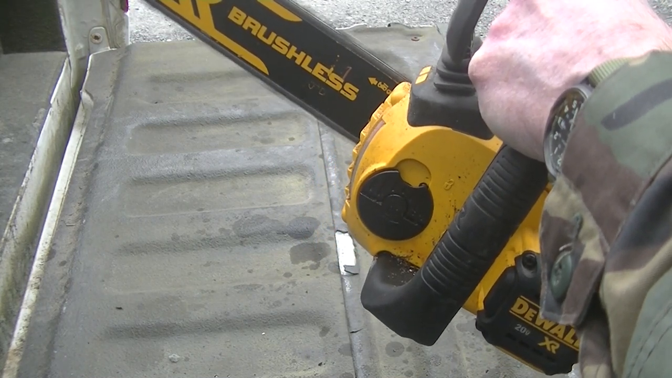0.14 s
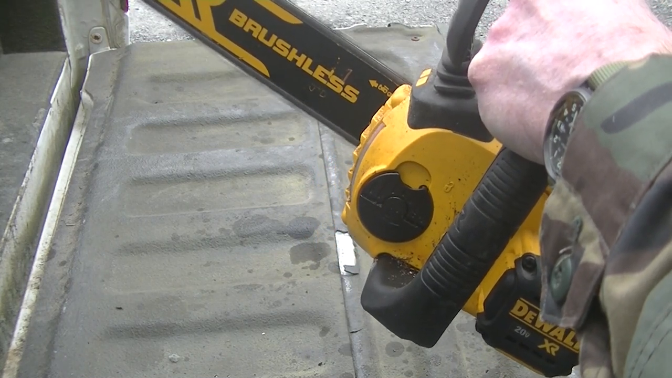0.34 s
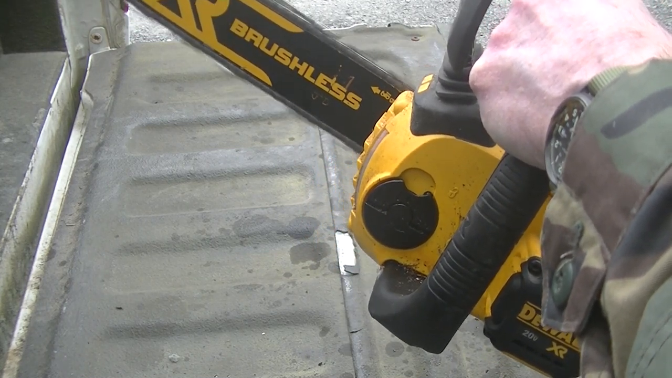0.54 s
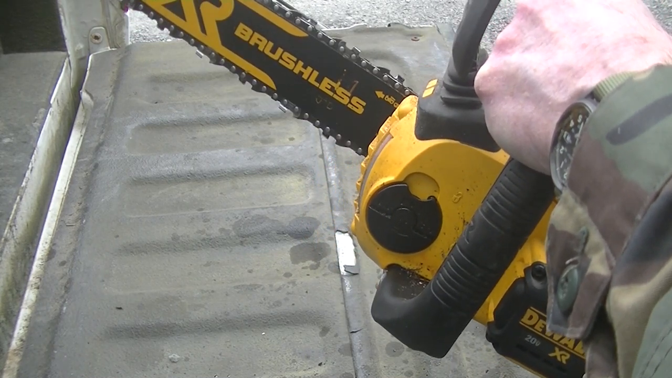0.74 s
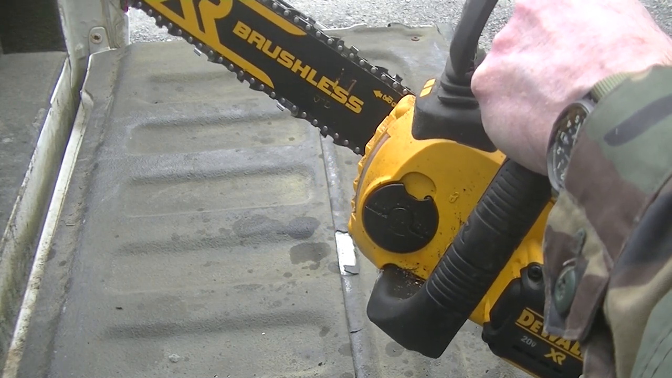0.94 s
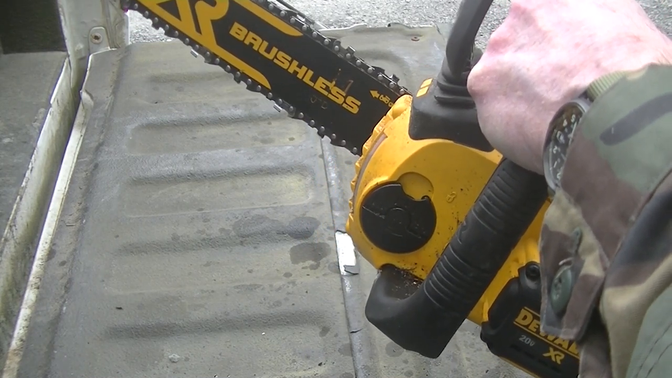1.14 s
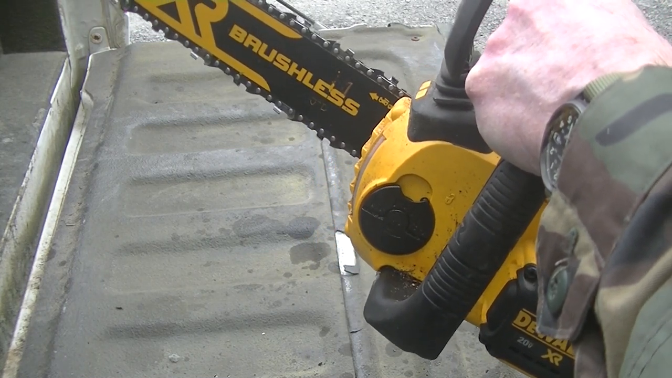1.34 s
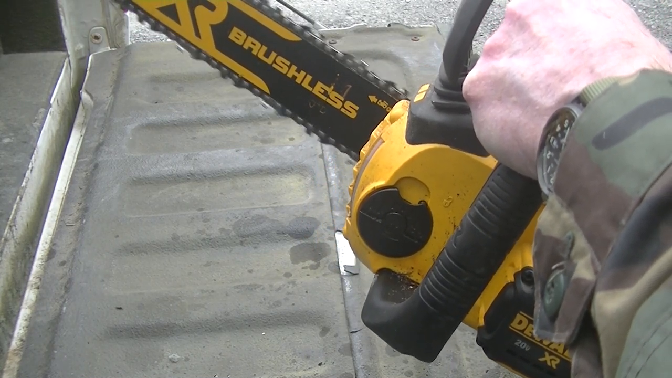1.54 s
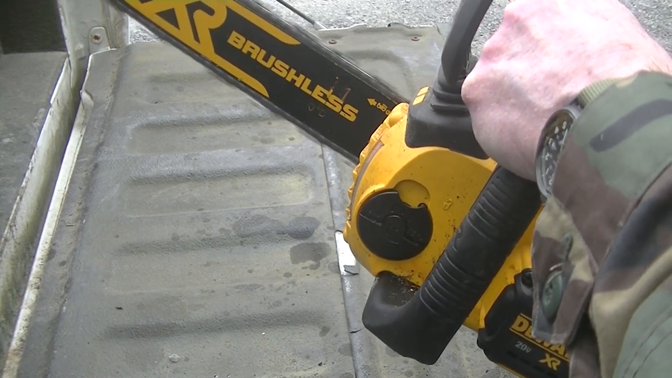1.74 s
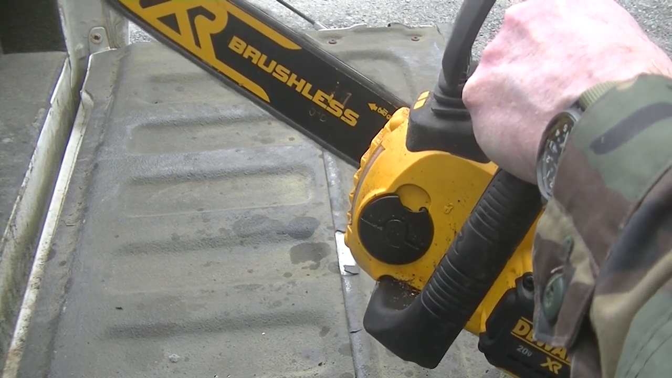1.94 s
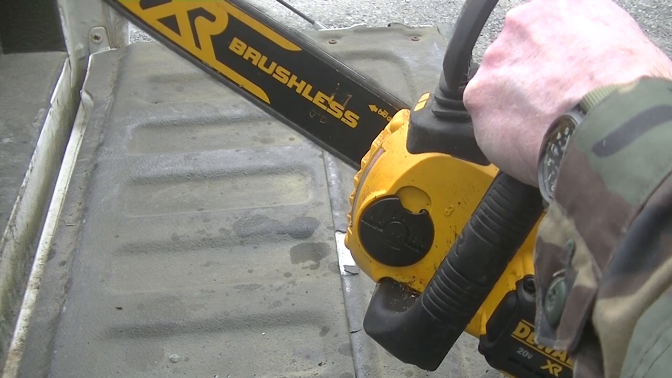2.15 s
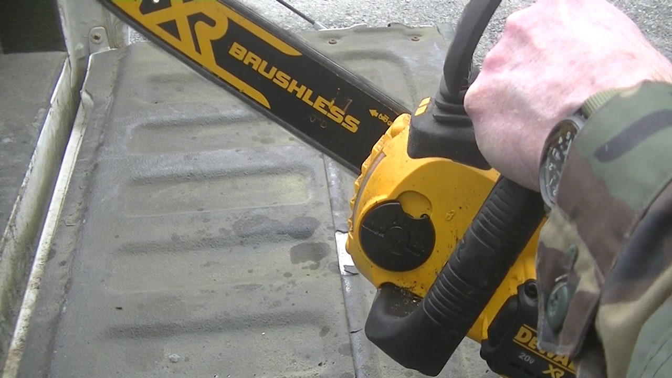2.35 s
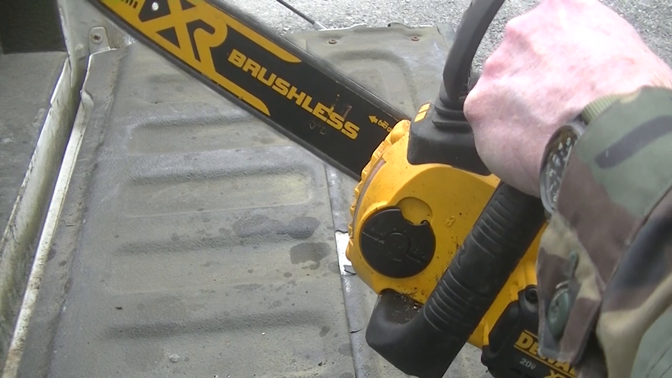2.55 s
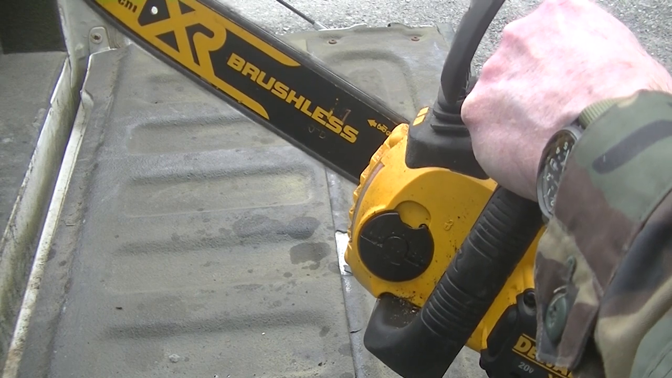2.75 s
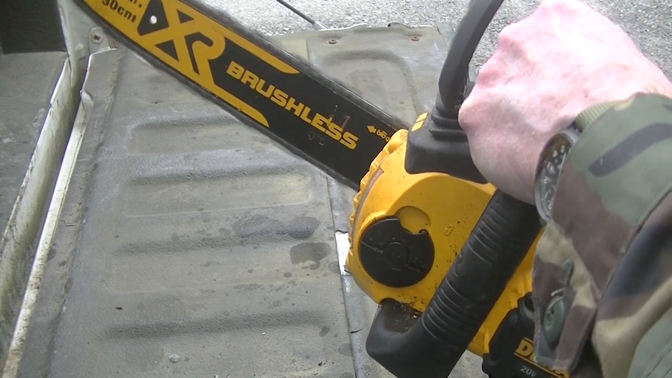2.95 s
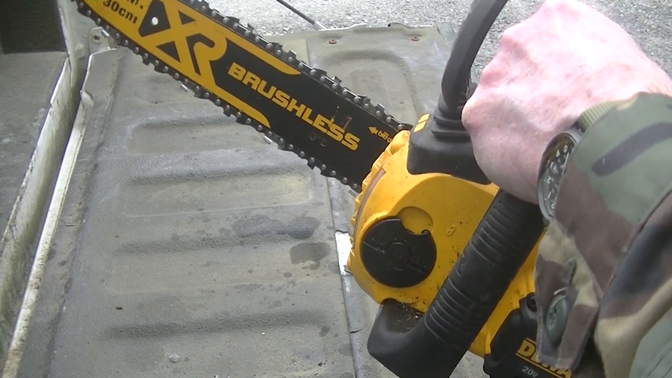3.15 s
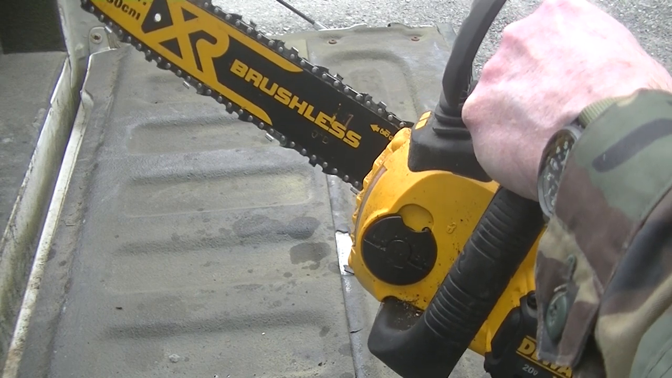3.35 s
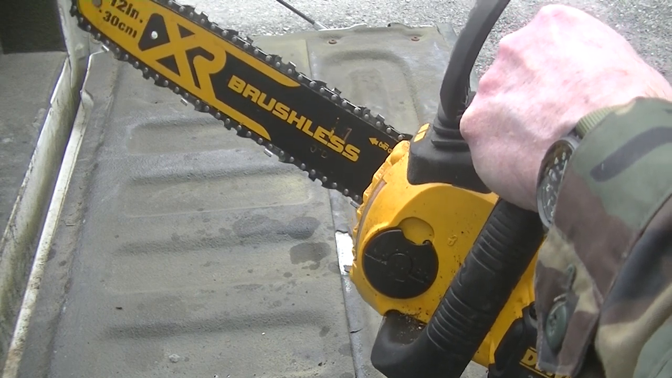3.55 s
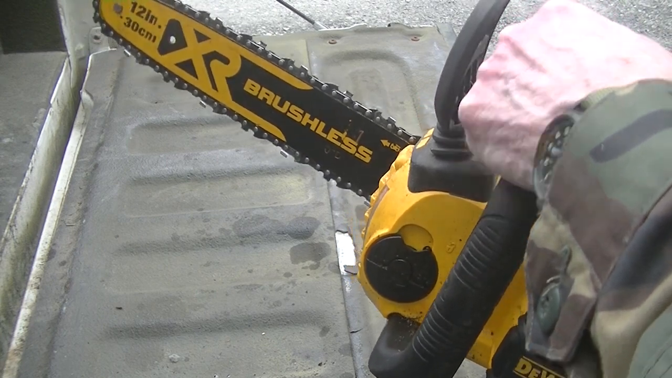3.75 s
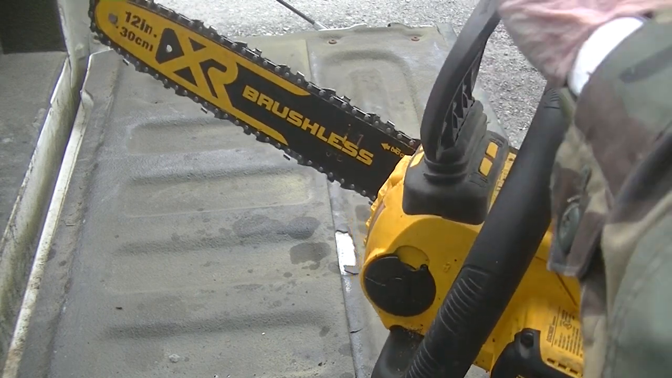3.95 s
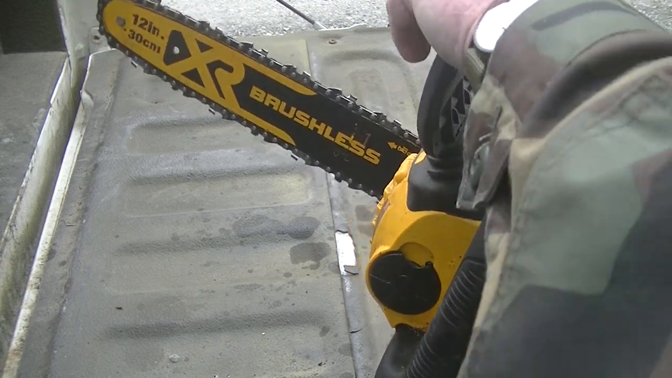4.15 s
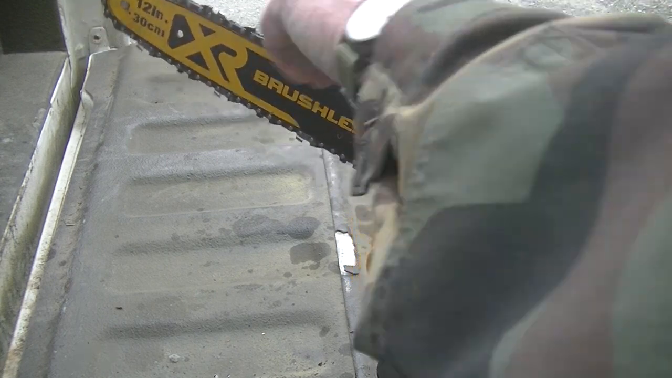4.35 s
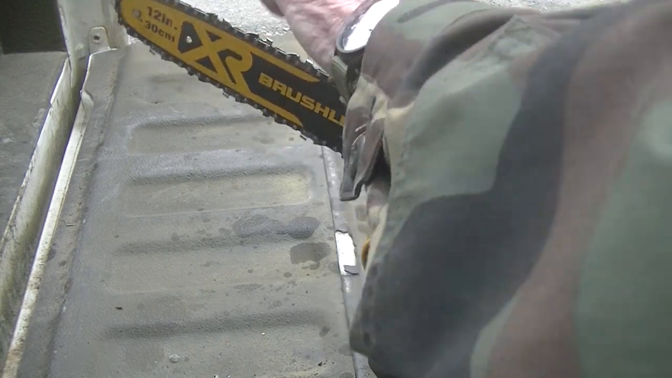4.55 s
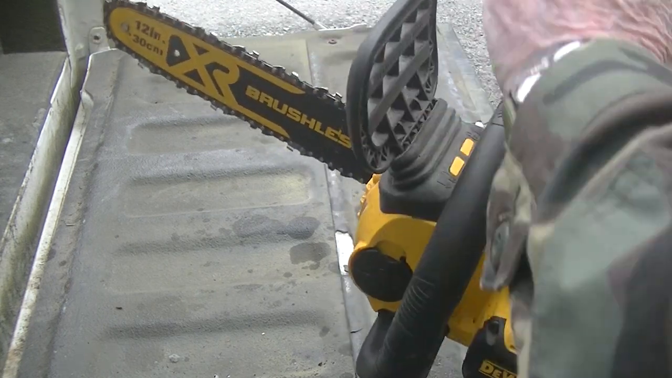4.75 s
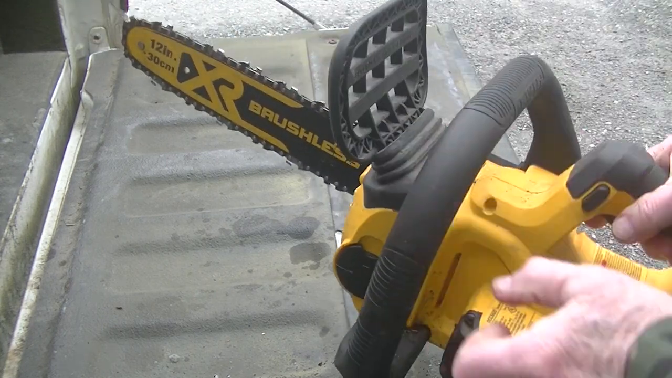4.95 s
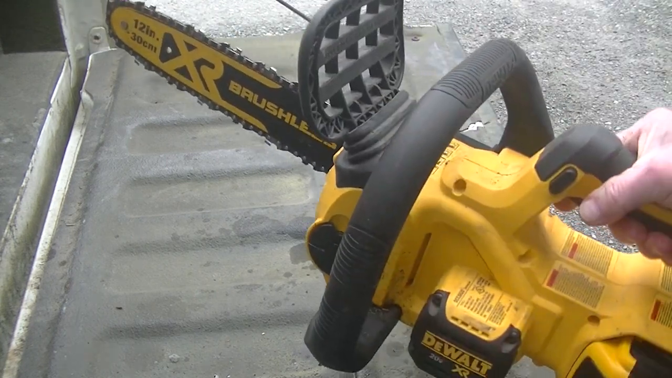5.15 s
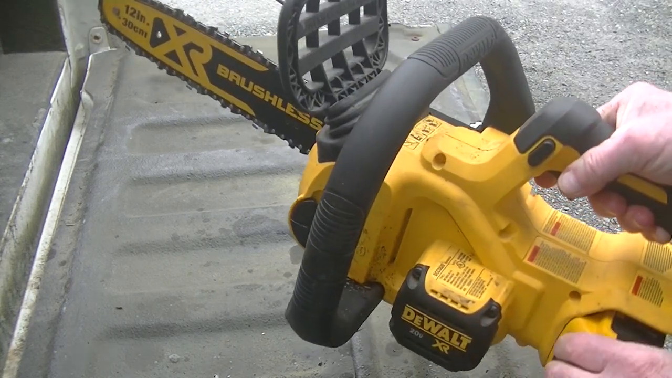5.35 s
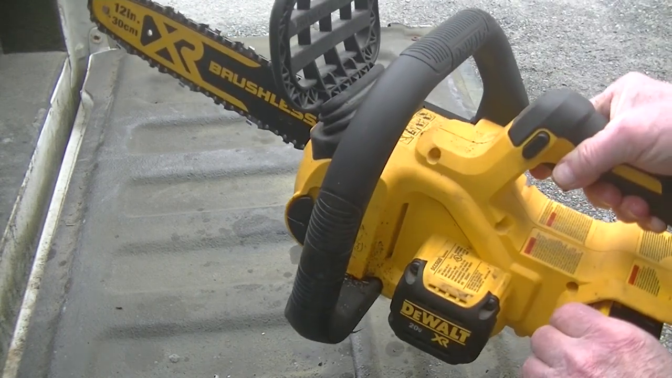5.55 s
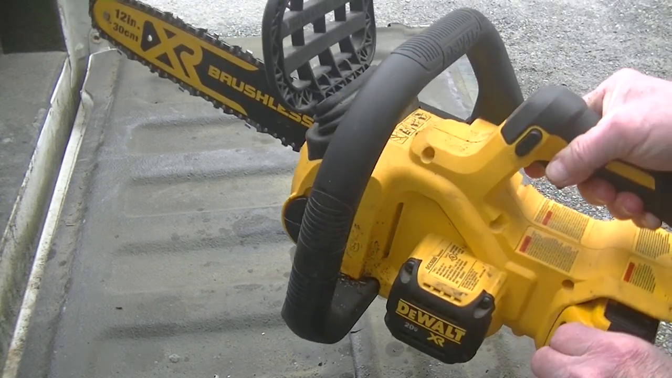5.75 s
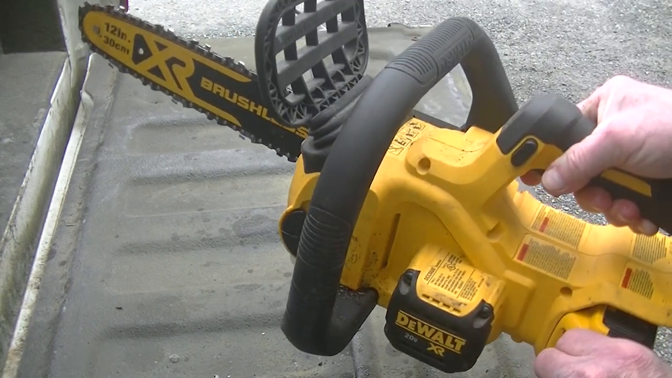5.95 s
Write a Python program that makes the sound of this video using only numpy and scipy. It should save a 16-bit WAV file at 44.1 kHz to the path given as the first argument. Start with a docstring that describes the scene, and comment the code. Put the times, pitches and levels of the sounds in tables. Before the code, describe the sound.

A cordless chainsaw runs without cutting, stops, whines up and stops again; then a sleeve rustles and the chain brake snaps.

```python
"""Cordless chainsaw running free

A chainsaw runs without load over a truck bed outdoors, stops, is run up again and stops.
Link impacts rattle along the bar, while the sprocket hums and the gear whines at multiples of the
shaft speed, all shaped by the resonances of bar and housing. Then a sleeve rustles, the chain brake
snaps, and the hands shift their grip and click the safety button."""
import sys
import numpy as np
from scipy import signal
from scipy.fft import irfft
from scipy.io import wavfile
from scipy.ndimage import uniform_filter1d

SR = 44100
rng = np.random.default_rng(int(sys.argv[2]) if len(sys.argv) > 2 else 0)


def pcm_store(signal):
    """Save signal as 16-bit PCM."""
    levels = np.round(np.clip(np.atleast_2d(signal), -1, 1) * 32767)
    wavfile.write(sys.argv[1], SR, levels.astype(np.int16).T)


N = 268569
T = np.arange(N) / SR
HZ = np.fft.rfftfreq(4096, 1 / SR)  # frequency axis of every filter curve


# Runs of the motor, the first already under way. Each row: trigger pull, trigger release and
# standstill in seconds, then relative chain level and gear level in dB.
MOTOR_RUNS = [(-1.1, 0.548, 0.705, 0.18, -35.5), (1.548, 2.925, 3.109, 0, -28)]
# Speed held by the governor. Each row: time in seconds, sprocket speed in turns per second.
GOVERNED_SPEED = [(0.1, 58.3), (0.3, 58.9), (0.5, 58.7), (2.3, 58.85), (2.68, 59.17), (2.9, 58.9)]

def motor_speed(surge_rate=175, ramp_rate=69.3, surge_s=0.13, knee=40):
    """Soft start and uniform braking: speed in turns per second surges, ramps, levels off and falls."""
    governed = np.interp(T, *np.transpose(GOVERNED_SPEED))
    speed = 0
    for start, release, rest, _, _ in MOTOR_RUNS:
        since = np.maximum(T - start, 0)
        ramp = np.minimum(surge_rate * since, surge_rate * surge_s + ramp_rate * (since - surge_s))
        held = ramp / (1 + (ramp / governed) ** knee) ** (1 / knee)
        speed = speed + held * np.clip((rest - T) / (rest - release), 0, 1)
    return speed


def run_gain(column):
    """Gating: one level column of the runs acts as a gain, zero while the motor rests."""
    return sum(amp(run[column]) * (T >= run[0]) * (T <= run[2]) for run in MOTOR_RUNS)


def torque(speed, full_acceleration=130):
    """Net torque is proportional to angular acceleration: near 1 at full pull, negative in braking."""
    return uniform_filter1d(np.gradient(speed) * SR, size=800) / full_acceleration


def chain(speed, turns, teeth=6, rattle_db=-20.1, hiss_db=-24.0):
    """Impact and friction noise: links strike the rails in bursts at the tooth rate and hiss as they slide."""
    bursts = 1 + 0.12 * np.cos(2 * np.pi * teeth * turns)
    flap = amp(0.5 * drift(45))  # the loose chain whips about
    strikes_per_s = 7000 * (.22 + (speed / speed.max()) ** 2)
    strikes = (rng.random(N) < strikes_per_s / SR) * np.sqrt(SR / strikes_per_s) * rng.choice([-1, 1], N)
    strikes *= unit(amp(-1.5 * rng.standard_normal(N))) * bursts * flap
    rattle = unit(colour(strikes, shell_db() + below(6950, order=4) + above(165, order=2)))
    sliding = strikes + bursts * flap * rng.standard_normal(N)
    hiss = unit(colour(sliding, shell_db() + above(7300, order=4)))
    rattle_gain, hiss_gain = chain_gains(speed)
    return amp(rattle_db) * rattle * rattle_gain + amp(hiss_db) * hiss * hiss_gain


def chain_gains(speed, saturation_speed=12):
    """Rattle saturates at low speed while friction hiss keeps growing; the motor's pull adds to both."""
    pull = np.clip(torque(speed), 0, 1)
    pace = speed + 0.19 * pull * speed.max()
    rattle = pace / np.hypot(pace, saturation_speed) * amp(2 * pull)
    hiss = (pace / speed.max()) ** 1.05
    running = run_gain(column=3)
    return running * rattle, running * hiss


# Radiation of bar and housing. Each row: frequency in Hz, relative gain in dB.
SHELL_RESPONSE = [(30.0, -46.5), (120.0, -48.5), (270.0, -42.5), (400.0, -26), (700.0, -29), (1200.0, -17),
                  (1700.0, -5), (2800.0, -7), (5000.0, -11), (8000.0, -20.5), (12000.0, -21),
                  (15500.0, -22.5)]
# Their resonances. Each row: frequency in Hz, width in Hz, height in dB.
SHELL_RESONANCES = [(420, 20, 2.6), (888, 205, 10.05), (1548, 200, 6.05), (1956, 130, 9.04),
                    (2256, 330, 4.2), (2577, 43, 7.1), (3013, 110, 3.5), (3831, 317, 9), (4523, 280, 7.8),
                    (5030, 65, 6.6), (5920, 151.3, 3.7), (6660, 910, 4), (10000, 1400, 7)]

def shell_db():
    """Frequency response of bar and housing: resonances on a broad curve, with the peak at 0 dB."""
    db = read(SHELL_RESPONSE) + resonances(SHELL_RESONANCES)
    return db - db.max()


# Hum of teeth and links. Each row: multiple of the sprocket speed, relative level in dB.
SPROCKET_HARMONICS = [(6, -22), (9, -32.5), (10, -25.5), (12, -17.5), (13, -35.5), (18, -24), (20, -31.5),
                      (21, -31.5), (22, -46), (24, -24.5), (27, -35.5), (28, -43), (30, -27), (32, -41),
                      (33, -33), (34, -45), (36, -51), (42, -31), (44, -33.5), (51, -35), (54, -28.5),
                      (55, -27), (60, -29), (63, -26), (66, -29), (67, -27), (71, -35)]
# Resonances of the sprocket cover. Each row: frequency in Hz, width in Hz, height in dB.
COVER_RESONANCES = [(414, 97, 1.5), (766, 62, 7.5), (900, 42, 10.5), (974, 48, 6.5)]

def sprocket(speed, turns, waver_depth=.22):
    """Periodic forcing: tooth harmonics grow with speed and torque, and swell as they cross resonances."""
    turns = turns + 0.0008 * drift(52)  # backlash
    wavers = [1 + waver_depth * drift(18) for _ in range(5)]
    hum = sum(amp(db) * wavers[i % len(wavers)] * np.cos(2 * np.pi * (multiple * turns + rng.random()))
              for i, (multiple, db) in enumerate(SPROCKET_HARMONICS))
    strain = np.minimum(abs(torque(speed)), .5)
    hum *= np.sqrt(2) * speed / speed.max() * amp(5 * strain - 0.5)
    return colour(hum, shell_db() + resonances(COVER_RESONANCES))


# Transmission of the whine through the gear case. Each row: frequency in Hz, gain in dB.
GEAR_RESPONSE = [(500, -36), (1200, -16), (1600, -3.5), (3000, -6), (4300, -1), (5200, 1), (6000, -19.5)]
# Resonances of that case. Each row: frequency in Hz, width in Hz, height in dB.
GEAR_RESONANCES = [(1590, 70, 14), (1900, 96, 15), (2270, 220, 18.7), (2835, 130, 12), (3090, 77, 11.5),
                   (3850, 130, 5.3), (4280, 200, 4.7)]
# Overtones that squeal at low speed. Each row: multiple of the mesh rate, relative level in dB.
SQUEAL_HARMONICS = [(2, 3), (3, 0.5)]
# Transmission of the squeal. Each row: frequency in Hz, gain in dB.
SQUEAL_RESPONSE = [(1000, -27), (1700, -3), (2150, 10.5), (2750, 10), (3400, -1.5), (3800, 3), (4300, -3),
                   (5200, -1), (6000, -20)]

def gear(speed, turns, teeth=73, squeal_speed=27):
    """Gear mesh: driven teeth whine at tooth count times shaft speed, filtered by the resonant case."""
    mesh_phase = 2 * np.pi * (teeth * turns + .04 * drift(60))
    squeal_phase = mesh_phase + .15 * drift(160)
    squeal = sum(amp(db) * np.cos(multiple * squeal_phase) for multiple, db in SQUEAL_HARMONICS)
    squeal /= 1 + (speed / squeal_speed) ** 12
    pull = torque(speed)
    load = np.clip(1 + 3 * pull, .08, 1) * np.clip(speed / 8, 0, 1)
    flutter_db = 1.5 * (1 + 2 * np.clip(pull, 0, 1))  # the chain tugs harder while it gathers speed
    excess_db = flutter_db ** 2 * np.log(10) / 20  # mean power that the flutter would add
    flutter = amp(flutter_db * drift(70) - excess_db + 1.5 * drift(9.9))
    gain = np.sqrt(2) * load * flutter * run_gain(column=4)
    whine = colour(gain * np.cos(mesh_phase), read(GEAR_RESPONSE) + resonances(GEAR_RESONANCES))
    return whine + colour(gain * squeal, read(SQUEAL_RESPONSE))


# Modes of the steel bar. Each row: frequency in Hz, level in dB, time to decay by 60 dB in seconds,
# level change under a slack chain in dB.
BAR_MODES = [(711, -62, 1, 4.5), (1584, -47.5, 0.26, 0), (2130, -39, 0.36, -43), (2270, -49.5, 0.18, 11),
             (3026, -48, 0.2, 3), (4590, -55, 0.19, 14), (4800, -58, 0.22, 10)]

def bar(speed, slap_db=2.5):
    """Modal ringing: the chain excites the bar, most modes harder when it runs slow and slack."""
    shake = rng.standard_normal(N) * np.clip(speed / 16, 0, 1) ** 2
    shake *= unit(amp(slap_db * drift(45)))  # the slaps come in uneven bunches
    slack = np.clip(1.6 - speed / 28, 0, 1)
    out, t = 0, T[:2 * SR]
    for hz, db, t60, slack_db in BAR_MODES:
        ring = amp(-60 * t / t60) * np.sin(2 * np.pi * hz * t)
        out = out + signal.oaconvolve(shake * amp(db + slack_db * slack), ring / np.linalg.norm(ring))[:N]
    return out


# Blows, among them the chain jerking to rest (0.71 s), the trigger (1.45 s), the gear taking up the
# chain (1.55 s) and the chain brake (4.35 s). Each row: start in seconds, level in dB, decay time in
# seconds, upper edge in Hz, relative after-rattle in dB, share that enters the bar from 0 to 1.
IMPACTS = [ (0.7120, -20.5, 0.0077, 4100, -17, 0.88), (1.442, -46, 0.0048, 5000, -13, .6),
           (1.4504, -24.5, 0.0061, 14000, -23, 0.52), (1.5440, -22, 0.0096, 5030, 12, 1),
           (1.5504, -13, 0.0009, 3300, -25, 0.73), (3.1196, -35, 0.004, 3430, -22, 0.9),
           (3.847, -44.5, 0.0075, 2970, -18, 0), (4.3489, -21.5, 0.0034, 7000, -18, 0.16),
           (4.352, -9, 0.0012, 11400, -11.5, 0.45), (4.4139, -40, 0.0032, 12000, -25, 0.3),
           (4.607, -49.5, 0.0037, 12000, -14, 0.2), (5.159, -57.5, 0.019, 172, -14, 0),
           (5.1892, -42, 0.0051, 10000, -16, 0.3), (5.264, -49, 0.0053, 14000, -15, 0.1),
           (5.594, -53, 0.003, 4500, -12, 0.1), ]
# Response of the struck plastic casing. Each row: frequency in Hz, gain in dB.
CASING_RESPONSE = [(35, -56.5), (60, -43.5), (433, -11), (1420, -10.5), (1740, -6), (2010, -19.5),
                   (2310, -11.5), (4630, -6.5), (5710, -12), (6870, -8), (15500, -31)]
# Its hollow resonances. Each row: frequency in Hz, width in Hz, height in dB.
CASING_RESONANCES = [(390, 38, 12), (2300, 300, 12.5), (3300, 290, 5.8)]

def knocks(rattle_decay_s=0.025):
    """Impact excitation: a short force pulse with a slower tail sets casing and bar ringing."""
    casing_db = read(CASING_RESPONSE) + resonances(CASING_RESONANCES)
    out, t = 0, T[:SR // 2]
    for start, db, decay, edge_hz, after_db, share in IMPACTS:
        crack = np.exp(-t / decay)
        tail = amp(after_db) * np.exp(-t / rattle_decay_s) * (1 - crack) / 2
        force = rng.choice([-1, 1], len(t)) * (crack + tail)
        body_db = share * shell_db() + (1 - share) * casing_db
        knock = colour(force, body_db + below(edge_hz, order=3) + above(90, order=1))
        out = out + place(knock, start, db)
    return out


# Press and return of the safety button. Each row: start in seconds, level in dB, upper edge in Hz.
BUTTON_CLICKS = [(5.95, -37, 1480), (5.99, -28, 3700)]
# Its modes. Each row: frequency in Hz, relative level in dB, time to decay by 60 dB in seconds.
BUTTON_RINGS = [(1330, -14, 0.048), (1750, 11, 0.0066), (2220, 6, 0.0079), (3050, 6, 0.0081),
                (3860, -8, 0.017)]

def button(chatter=0.043, chatter_decay_s=0.0084):
    """Damped free vibration: a small plastic part snaps, then chatters briefly on its spring."""
    out, t = 0, T[:SR // 5]
    ring = sum(amp(db - 60 * t / t60) * np.sin(2 * np.pi * hz * t) for hz, db, t60 in BUTTON_RINGS)
    for start, db, edge_hz in BUTTON_CLICKS:
        force = (t == 0) + chatter * rng.standard_normal(len(t)) * np.exp(-t / chatter_decay_s)
        click = colour(signal.oaconvolve(force, ring), above(1510, order=4) + below(edge_hz, order=3))
        out = out + place(click, start, db)
    return out


# Spectrum of rubbing cloth. Each row: frequency in Hz, relative level in dB.
CLOTH_SPECTRUM = [(88, -79), (150, -25), (357, 0), (972, -3), (1050, -1.5), (2700, 6.5), (7080, -3),
                  (15000, -37)]
# Strokes of sleeve and hands. Each row: peak time, rise and fall in seconds, rub and fizz levels in dB.
SLEEVE_STROKES = [ (3.835, 0.052, 0.032, -48.5, -54), (4.07, 0.085, 0.13, -49.5, -61.5),
                  (4.11, 0.015, 0.02, -74, -57), (4.36, 0.09, 0.21, -46, -66),
                  (4.55, 0.027, 0.12, -52, -78), (4.895, 0.013, 0.016, -50, -46.5),
                  (4.93, 0.22, 0.18, -54, -65), (5.41, 0.22, 0.17, -58, -67), (5.65, 0.087, 0.29, -61, -67),
                  ]

def sleeve(grain_db=4, roundness=1.17):
    """Stick-slip friction: cloth fibres catch and let go in clumps as each stroke swells and fades."""
    grains = rng.standard_normal(N) * amp(grain_db * rng.standard_normal(N) + 1.14 * drift(62))
    rub = unit(colour(grains, read(CLOTH_SPECTRUM) + below(7600, order=3)))
    fizz = unit(colour(grains, above(7200, order=3) + below(9000, order=1)))
    rub_power = fizz_power = 0
    for peak, rise, fall, rub_db, fizz_db in SLEEVE_STROKES:
        swell = np.exp(-abs((T - peak) / np.where(T < peak, rise, fall)) ** roundness)
        rub_power = rub_power + (amp(rub_db) * swell) ** 2
        fizz_power = fizz_power + (amp(fizz_db) * swell) ** 2
    return rub * np.sqrt(rub_power) + fizz * np.sqrt(fizz_power)


def draught(speed, level_db=-69, edge_hz=130):
    """Flow noise: the moving chain stirs a faint low rumble of air in proportion to its speed."""
    rumble = unit(colour(rng.standard_normal(N), below(edge_hz, order=1)))
    return amp(level_db) * speed / speed.max() * rumble


# Spectrum of the outdoor background. Each row: frequency in Hz, relative level in dB.
HUSH_SPECTRUM = [(18, -48.5), (30, -41.5), (144, -16.5), (168, -11.5), (256, -6.5), (532, -3.5),
                 (575, -10.5), (622, -7), (1230, -6.5), (2830, 0), (4660, -6), (8060, -13.5),
                 (15500, -19.5)]

def air(hush_db=-59, whistle_db=-80):
    """Ambient noise: a steady broadband hush with a thin high tone."""
    hush = unit(colour(rng.standard_normal(N), read(HUSH_SPECTRUM)))
    whistle = np.sin(2 * np.pi * np.cumsum(7865 + 20 * drift(30)) / SR)
    return amp(hush_db) * hush + amp(whistle_db) * whistle


def reflections(x, t60, delay):
    """Diffuse reverberation: dense echoes of unit total energy decay exponentially."""
    t = T[:SR]
    taps = rng.standard_normal(SR) * amp(-60 * t / t60) * (t >= delay)
    return signal.oaconvolve(x, taps / np.linalg.norm(taps))[:N]


def amp(db):
    """Amplitude ratio of a level in decibels."""
    return 10 ** (np.asarray(db) / 20)


def unit(x):
    """Normalisation to rms 1."""
    return x / np.sqrt(np.mean(x ** 2) + 1e-20)


def read(points):
    """Interpolation of a spectrum over log frequency."""
    hz, db = np.transpose(points)
    return np.interp(np.log(HZ + 1), np.log(hz + 1), db)


def resonances(modes):
    """Bell-shaped resonance peaks in dB."""
    return sum(height / (1 + (2 * (HZ - hz) / width) ** 2) for hz, width, height in modes)


def above(edge_hz, order):
    """High-pass response in dB."""
    return -10 * np.log10(1 + (edge_hz / (HZ + 1)) ** (2 * order))


def below(edge_hz, order):
    """Low-pass response in dB."""
    return -10 * np.log10(1 + (HZ / edge_hz) ** (2 * order))


def colour(x, db):
    """Minimum-phase filtering with the given gain over HZ."""
    log_gain = np.log(amp(np.maximum(db, db.max() - 100)))
    log_response = np.conj(signal.hilbert(np.r_[log_gain, log_gain[-2:0:-1]]))
    taps = np.fft.ifft(np.exp(log_response)).real
    return signal.oaconvolve(x, taps)[:len(x)]


def drift(rate_hz):
    """Band-limited random fluctuation of rms 1."""
    band = np.fft.rfftfreq(N, 1 / SR) < rate_hz
    return unit(irfft(band * (rng.standard_normal(len(band)) + 1j * rng.standard_normal(len(band))), N))


def place(blow, start, db):
    """A blow delayed to its start, with the given rms level over its first 5 ms."""
    delayed = np.pad(blow, (round(start * SR), N))[:N]
    return delayed * amp(db) / np.sqrt(np.mean(blow[:SR // 200] ** 2))


# Stereo width at the two microphone ports. Each row: frequency in Hz, gain of the side signal in dB.
SIDE_RESPONSE = [(60, 11.5), (125, 6), (280, -1.5), (600, -9), (1200, -13.5), (1700, -23), (2400, -9.5),
                 (4400, -7.5), (8000, -3), (15000, -5)]

def scene(bed_db=-15, yard_db=-31, tone_spread=0.35):
    """Superposition: direct sound and reflections from truck bed and yard reach two microphone ports."""
    speed = motor_speed()
    turns = np.cumsum(speed) / SR
    tones = sprocket(speed, turns) + gear(speed, turns) + bar(speed) + button()
    saw = chain(speed, turns) + draught(speed) + knocks() + tones
    bed = amp(bed_db) * reflections(saw, t60=0.12, delay=0.00061)
    yard = amp(yard_db) * colour(reflections(saw, t60=0.44, delay=0.099), below(5000, order=1))
    mid = saw + bed + yard + sleeve() + air()
    # the chain is long and close, so the two ports hear partly unrelated rattle
    unrelated = chain(speed, turns) + 0.86 * knocks() + sleeve() + air()
    unrelated += tone_spread * reflections(tones + yard, t60=0.0071, delay=0)
    side = colour(unrelated, read(SIDE_RESPONSE))
    return np.array([mid + side, mid - side]) * amp([[-.25], [.25]])


def record(dry, edge_hz=16000):
    """Clipping at full scale, followed by band limiting."""
    lowpass = signal.firwin(401, edge_hz, window=("kaiser", 8), fs=SR)
    return signal.oaconvolve(np.clip(dry, -1, 1), lowpass[None], "same")


dry = scene()
out = record(dry)
pcm_store(out)
```